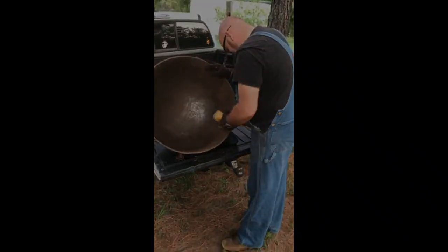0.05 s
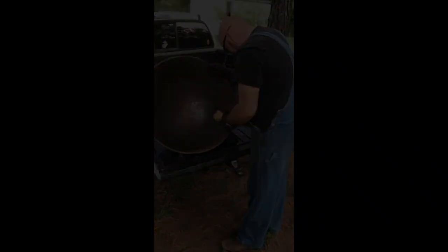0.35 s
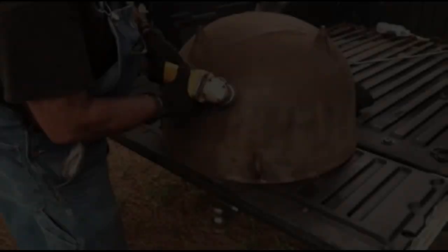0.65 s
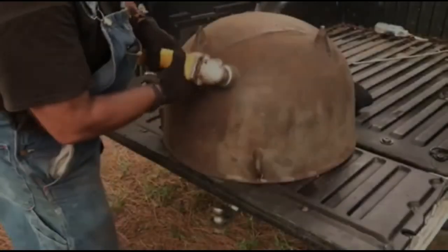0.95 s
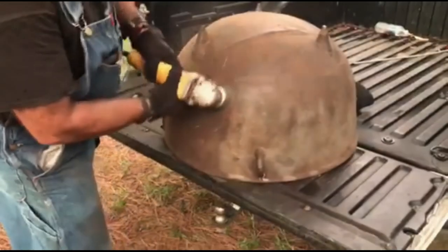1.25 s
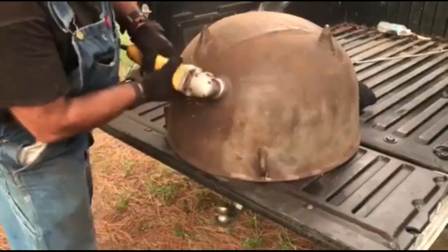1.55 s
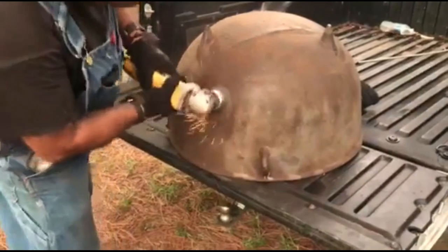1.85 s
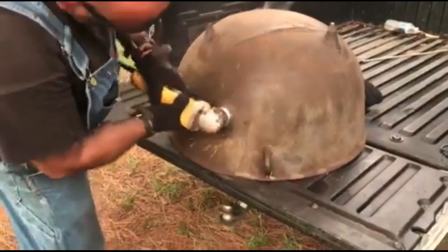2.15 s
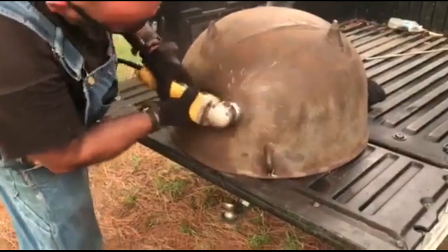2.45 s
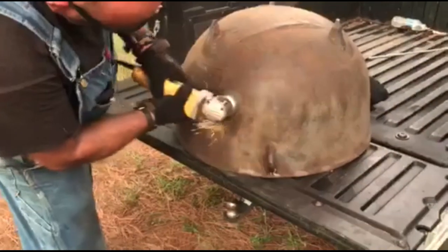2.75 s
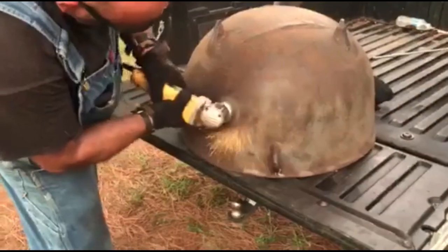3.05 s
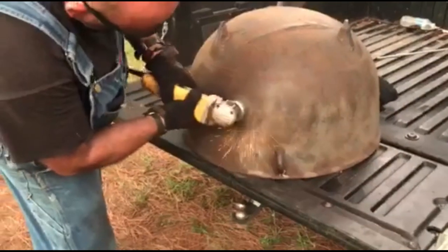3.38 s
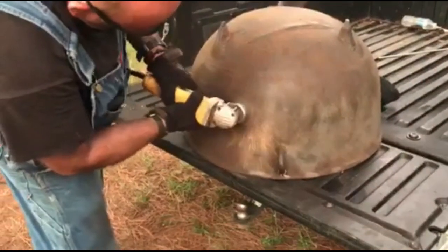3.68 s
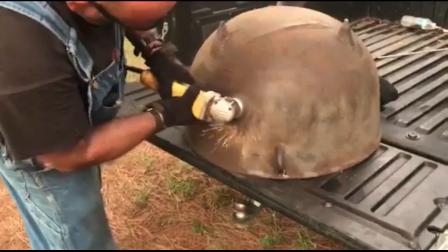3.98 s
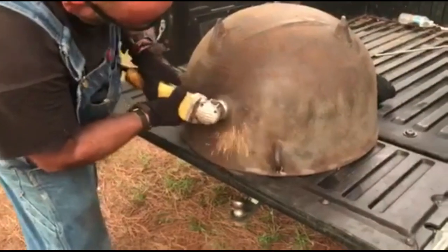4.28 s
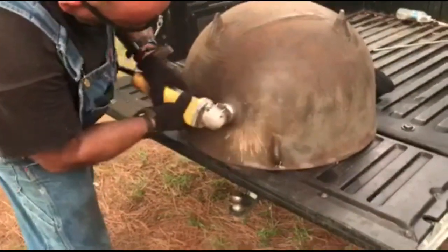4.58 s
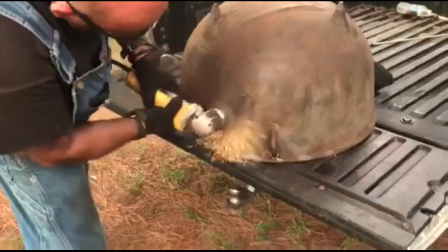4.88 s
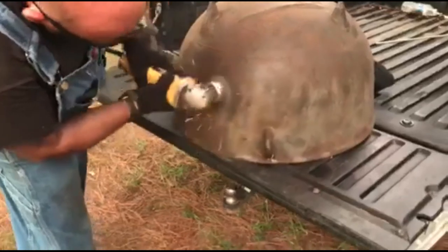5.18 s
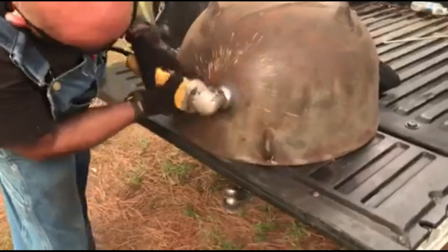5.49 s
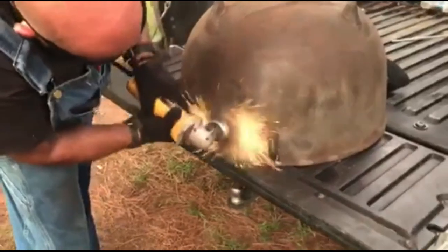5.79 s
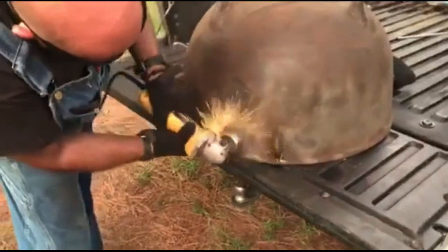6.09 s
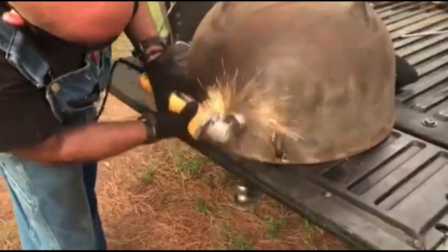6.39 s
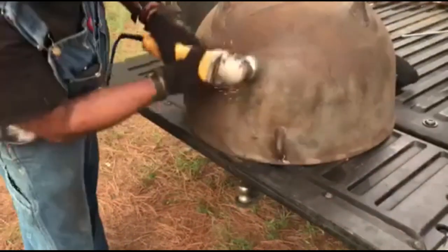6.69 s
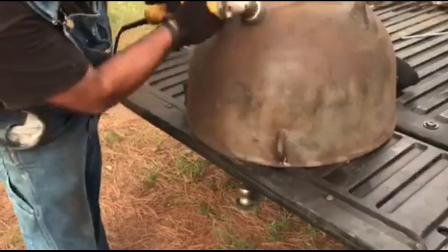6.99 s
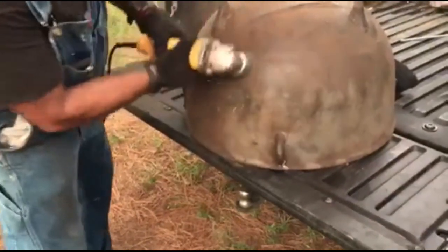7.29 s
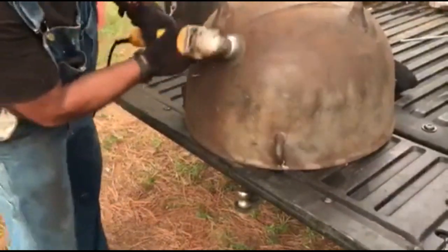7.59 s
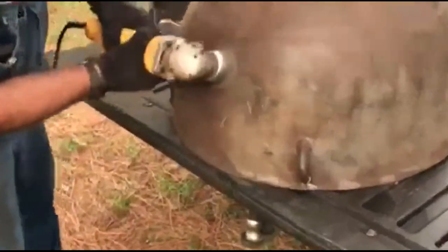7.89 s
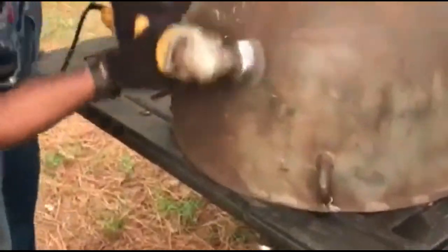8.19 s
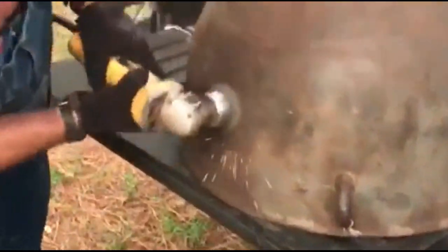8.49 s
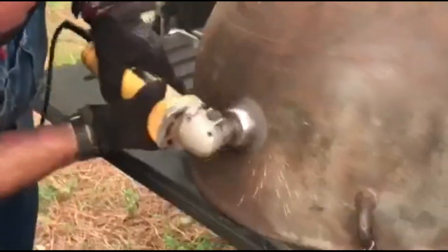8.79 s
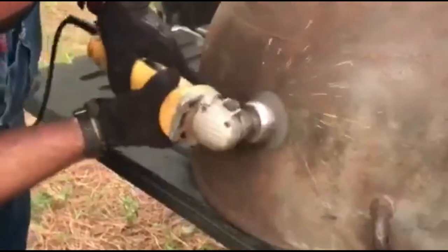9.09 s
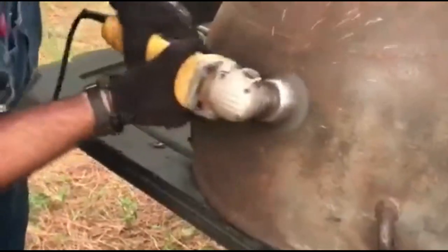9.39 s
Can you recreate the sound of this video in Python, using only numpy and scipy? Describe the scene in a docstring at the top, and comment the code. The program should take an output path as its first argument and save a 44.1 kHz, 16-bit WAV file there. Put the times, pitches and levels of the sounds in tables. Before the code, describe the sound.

Heard close up outdoors with no echo, a spinning wire brush grinds steadily against a big iron pot. The bright, scratchy hiss starts abruptly and keeps fluttering, with tiny catches on rough metal. The angle grinder's whine and thin fan whistle sit beneath it, sag under pressure past halfway and climb back. In the second half the iron's ringing colour changes several times, while a very faint hum stays in the background.

```python
"""A harsh, flickering hiss comes first: an angle grinder's wire cup brush scouring rust off a big
cast iron pot, outdoors, heard close on one microphone with no echo. Thousands of wire tips a second
scratch the iron, and each place on the pot rings in its own way. Under the hiss, motor and fan whine
and the spindle drones; their pitch sags when the brush is pushed hard against the rim.
A faint low hum lies behind it all."""
import sys
import numpy as np
from scipy import signal
from scipy.fft import rfft, irfft
from scipy.io import wavfile
from scipy.ndimage import uniform_filter1d

SR = 44100
rng = np.random.default_rng(int(sys.argv[2]) if len(sys.argv) > 2 else 0)


def unload_audio(sound):
    """Save the sound as a 16-bit wav file, at the path given as the first command line argument."""
    columns = np.transpose(np.atleast_2d(sound))
    # keep every value between -1 and 1, then stretch to whole-number steps
    steps = np.round(np.clip(columns, -1, 1) * 32767)
    wavfile.write(sys.argv[1], SR, steps.astype(np.int16))


N = 425565
T, HZ = np.arange(N) / SR, np.fft.rfftfreq(N, 1 / SR)

# how hard the wires bite, heard as the hiss: (time [s], level [dB])
HISS_LEVELS = [(0.85, -34.5), (1.2, -34.5), (1.36, -32.5), (1.6, -33), (2.3, -34), (2.56, -32.5),
               (2.84, -34), (3.12, -33), (3.3, -33.5), (3.95, -34.3), (4.2, -34), (4.46, -35.2),
               (4.67, -33.7), (4.9, -35), (5.15, -33.5), (5.32, -32.5), (5.52, -33), (5.63, -32.5),
               (5.88, -35), (6.05, -35), (6.5, -35.5), (6.92, -33), (7.22, -34.2), (7.36, -32.5),
               (7.7, -35), (7.8, -32), (8.1, -32), (8.39, -32), (8.46, -33.5), (8.59, -35.5), (8.68, -32),
               (9.18, -32.5), (9.6, -32)]
# the brush's dull rub and the pot's ring: (time [s], rub level [dB], ring level [dB])
RUB_AND_RING_LEVELS = [(1.3, -51.5, -40.5), (2.6, -51.5, -41.5), (5.7, -51.5, -42), (6.6, -54, -41),
                       (7.1, -53.5, -40), (9.65, -53, -40)]
# wires catching on rough iron: (time [s], length [s], boost [dB])
WIRE_CATCHES = [(1.33, 0.012, 2), (1.754, 0.022, 1.5), (2.108, 0.033, 2), (2.205, 0.018, 1.5),
                (2.403, 0.022, 2), (2.545, 0.1, 0.5), (2.952, 0.02, 1.5), (3.095, 0.05, 0),
                (3.348, 0.015, 2.5), (3.623, 0.013, 1.5), (3.805, 0.021, 1), (3.89, 0.021, 1.5),
                (4.16, 0.025, 2.5), (4.392, 0.022, 3), (4.66, 0.02, 0), (4.895, 0.031, 1),
                (5.308, 0.028, 2), (5.397, 0.018, 1.5), (5.579, 0.018, 0), (5.641, 0.021, 0.5),
                (5.81, 0.03, 2), (6.737, 0.024, 2.3), (6.973, 0.012, 1), (7.419, 0.022, 1),
                (7.496, 0.018, -1.5), (7.62, 0.016, 2.5), (7.663, 0.024, 2.5), (7.718, 0.018, 6.5),
                (7.883, 0.006, 2), (8.101, 0.02, 2.5), (8.177, 0.014, 1.5), (8.319, 0.017, 2.5),
                (8.641, 0.013, 2.5), (8.77, 0.011, 3), (8.827, 0.025, 0)]
# spectrum of wire on iron: (frequency [Hz], relative level [dB])
SCRATCH_SPECTRUM = [(20, -41.5), (45, -21.5), (100, -22.5), (170, -24), (330, -23.5), (480, -16),
                    (800, -12.5), (1050, -7), (1450, -7.5), (1800, -10), (2300, -7), (3200, -1), (4600, 1),
                    (4900, -1.5), (6300, 0.5), (8200, 5), (9000, -1)]
# resonances with the brush at each place on the pot: (frequency [Hz], width [Hz], boost [dB])
SIDE_WALL_MODES = [(260, 36, 6.5), (420, 35, 3.5), (680, 580, 2), (880, 420, 1.5), (1086, 100, 4),
                   (1295, 100, 4.5), (1510, 90, 3), (2330, 600, 4.5), (3420, 640, 0.5), (5140, 810, 0.5),
                   (7400, 1500, 2.5)]
LOWER_WALL_MODES = [(626, 250, 1), (1100, 84, 6.5), (1540, 110, 5), (2200, 130, 1), (2600, 150, 2),
                    (3320, 290, 2), (3620, 160, 1.5), (4150, 250, -0.5), (4600, 350, 1.5), (6950, 900, 0.5)]
RIM_MODES = [(275, 60, 5), (580, 20, 9.5), (700, 500, 1), (940, 180, 6), (1080, 89, 3), (1640, 320, 5),
             (1890, 60, 3.5), (2330, 140, 4), (3270, 240, 5.5), (3680, 350, 1), (4020, 200, 2.5),
             (4500, 260, 1), (5580, 1100, 5.5), (7040, 160, 4), (8400, 2700, 7.5)]
SHOULDER_MODES = [(258, 49, 8.4), (416, 25, 2), (607, 41, 2.6), (820, 170, 4.6), (1300, 460, 8.5),
                  (1570, 150, 5.5), (1970, 200, 4.5), (2190, 460, 6), (3820, 1100, 4.4), (5670, 1100, 2.8),
                  (7600, 590, 3.5)]
UPPER_WALL_MODES = [(266, 48, 4), (1170, 710, 4), (1640, 280, 6), (1940, 120, 5), (2220, 190, 6),
                    (3200, 250, 4.5), (3580, 230, 4), (4210, 190, 4.5), (4530, 400, 1), (5270, 1400, 3)]
BELLY_MODES = [(255, 240, 4.2), (570, 97, 3.7), (816, 32, 5.5), (1060, 96, 6.2), (1266, 220, 7),
               (1610, 280, 3.3), (1990, 130, 5.6), (2304, 270, 8.3), (3700, 400, 1.4), (4630, 550, 2.9),
               (5400, 660, 4)]
# the brush moves on to the next place, in the order above: (midpoint time [s], length [s])
BRUSH_MOVES = [(5.2, 0.36), (5.78, 0.19), (6.78, 0.58), (7.36, 0.19), (8.38, 0.28)]
# fuzzy tones in the hiss: (time [s], length [s], frequency [Hz], width [Hz], level [dB])
FUZZY_TONES = [(0.98, 0.54, 4040, 56, -43), (1.0, 0.6, 1210, 54, -51), (4.88, 0.33, 2125, 5.8, -47),
               (5.31, 0.1, 4150, 140, -43), (5.46, 0.42, 3300, 76, -49), (5.554, 0.36, 3590, 34, -45),
               (6.303, 0.24, 1950, 12, -45), (6.35, 0.63, 4170, 48, -48), (6.55, 0.61, 3300, 79, -45),
               (7.48, 0.32, 1940, 9.8, -46), (7.58, 0.55, 4100, 120, -38), (7.57, 0.43, 4540, 80, -36.5),
               (7.987, 0.1, 1945, 12, -41.5)]
# brief dips in the low end: (time [s], length [s], corner frequency [Hz], gain [dB])
BASS_DIPS = [(1.134, 0.029, 430, -22), (1.428, 0.016, 850, -8), (1.753, 0.018, 850, -19),
             (2.116, 0.032, 430, -26), (3.01, 0.026, 900, -12), (3.078, 0.025, 900, -12),
             (3.137, 0.03, 636, -32), (3.476, 0.045, 420, -36), (3.612, 0.018, 800, -23),
             (3.89, 0.023, 900, -20), (4.384, 0.02, 430, -12), (4.707, 0.026, 430, -11),
             (5.333, 0.035, 850, -10), (5.392, 0.036, 430, -21), (5.685, 0.025, 450, -22),
             (6.956, 0.024, 950, -19), (7.09, 0.024, 900, -15), (7.728, 0.034, 850, -10),
             (7.952, 0.014, 800, -23), (8.022, 0.025, 850, -15), (9.33, 0.021, 850, -14),
             (9.492, 0.022, 850, -19)]

# motor speed, sagging under load: (time [s], speed [turns/s])
MOTOR_SPEED = [(0.64, 533), (1.5, 535), (1.85, 548), (2.7, 524), (3.3, 533), (4.4, 516), (4.8, 522),
               (5.65, 516), (5.86, 487), (6.05, 467), (6.4, 459), (6.7, 471), (6.95, 496), (8.35, 520),
               (8.55, 507), (9.25, 521), (9.65, 524)]
# tones of the motor shaft and of its cooling fan: (multiple of motor speed, base level [dB])
MOTOR_TONES = [(1, -59.5), (2, -64)]
FAN_TONES = [(9, -52)]
# tones of the unbalanced brush on the spindle: (multiple of spindle speed, base level [dB])
SPINDLE_TONES = [(1, -69), (2, -77), (3, -79)]
# swells of whine and drone: (time [s], motor gain [dB], spindle gain [dB])
MACHINE_GAINS = [(0.64, 2.5, 7), (0.95, -2, 1), (1.2, -4, 2), (1.75, 0.5, 4.5), (2.15, 3.5, 4.5),
                 (2.5, -3, 1.5), (3.0, -1.5, 0.5), (3.22, 4.5, 2.5), (3.48, 6.5, 2), (3.6, -1, 2),
                 (3.75, 3, 0), (3.95, 0.5, 2), (4.25, 4, -2), (4.45, -9, 2), (4.72, 6, -2), (4.88, -4, -1),
                 (5.6, -0.5, 2), (5.85, -1.5, 2), (6.1, 5.5, -2), (6.4, 4, -1), (6.7, 3, -2), (6.8, 0, -20),
                 (6.92, 0.5, -8), (7.02, -13, -8), (7.6, -12, 3), (8.6, -6, 5), (9.65, -8, 0)]
# fan whistle, clearest with the brush jammed against the rim: (time [s], gain [dB])
FAN_GAINS = [(0.64, 3.5), (5.6, 2), (5.95, -6), (6.2, 6), (6.6, 7), (6.75, 1), (7.3, 0), (9.65, 0)]

# dips in the microphone's response: (frequency [Hz], width [Hz], gain [dB])
MICROPHONE_DIPS = [(4770, 140, -3.5), (6150, 140, -3.5), (7654, 575, -13)]


def scouring(hand_db=-0.02, fizz_db=-37):
    """The brush on the pot: bite, catches and load set the levels of rub, ring, hiss and fizz."""
    bite, load, caught = curves(HISS_LEVELS)[0], sag_percent(), catches()
    unsteady = hand_db * wander(rate=6) + chatter()  # the hand's pressure is never quite even
    rub, ring = curves(RUB_AND_RING_LEVELS)
    fizz = fizz_db + 0.35 * (bite - bite.mean()) - 0.1144 * load  # load flattens the wires
    bands = [(800, rub + 0.2252 * load),  # (upper edge [Hz], level [dB])
             (2200, ring + 0.15 * caught),
             (5200, bite + unsteady + caught),
             (11000, fizz + unsteady + 0.44 * caught)]
    spectrum = rfft(pot(wire_tips(caught)))
    sound, lower = np.zeros(N), 0
    for edge_hz, level_db in bands:
        lowpass = 1 / (1 + (HZ / edge_hz) ** 8)
        band = irfft(spectrum * (lowpass - lower), N)
        power = uniform_filter1d(uniform_filter1d(band ** 2, SR // 5), SR // 5)
        sound += amp(level_db) * band / np.sqrt(power + 1e-12)
        lower = lowpass
    return sound


def wire_tips(caught_db, strikes_per_s=16000, spread_db=2.0, bounce_db=0.12):
    """Tiny strikes of uneven size, swelling as the brush bounces and coarser where it catches."""
    strikes = (rng.random(N) < strikes_per_s / SR) * rng.choice([-1., 1.], N)
    size_db = (spread_db + 0.077 * caught_db) * np.minimum(rng.exponential(1, N), 4)
    return strikes * amp(size_db + bounce_db * wander(rate=15))


def catches():
    """The change in bite, in dB, while the wires catch on rough iron."""
    return sum(db * np.exp(-(2 * (T - time) / length) ** 2) for time, length, db in WIRE_CATCHES)


def chatter(depth_db=0.3, skips_per_s=(18, 32)):
    """The flutter, in dB, of the springy brush skipping on the iron."""
    band = signal.butter(2, skips_per_s, "bandpass", fs=SR, output="sos")
    return depth_db * unit(signal.sosfilt(band, rng.standard_normal(N)))


def pot(strikes):
    """The strikes ring the pot; its colour passes from place to place with the brush."""
    hz, db = np.transpose(SCRATCH_SPECTRUM)
    colour = amp(np.interp(np.log(HZ + 1), np.log(hz), db))
    scratch = rfft(shimmer(iron_ring(strikes))) * colour
    path = (SIDE_WALL_MODES, LOWER_WALL_MODES, RIM_MODES, SHOULDER_MODES, UPPER_WALL_MODES, BELLY_MODES)
    sound, *later_places = [unit(irfft(scratch * response(modes), N)) for modes in path]
    for (time, length), place in zip(BRUSH_MOVES, later_places):
        arrived = np.clip((T - time) / length + 0.5, 0, 1)
        sound = (1 - arrived) * sound + arrived * place
    return sound


def iron_ring(strikes, t60_s=0.095, share=0.34, spots=44):
    """The thick wall rings briefly in a crowd of close modes; each spot brushed wakes another mix."""
    decay = np.exp(-np.log(1000) * T[:SR // 5] / t60_s)
    sound, stay = strikes.copy(), N // spots
    for start in range(0, N - stay, stay):
        passing = strikes[start:start + 2 * stay]
        window = np.sqrt(np.hanning(len(passing)))
        tail = rng.standard_normal(len(decay)) * decay
        ring = signal.fftconvolve(passing * window, tail / np.linalg.norm(tail))[:N - start]
        sound[start:start + len(ring)] += share * ring
    return sound


def shimmer(sound, mid_db=1.58, treble_db=3.5, broad_db=0.79):
    """The hiss flickers: narrow bands swell and fade, most of all in the treble."""
    hz, t, frames = signal.stft(sound, SR, nperseg=1024, noverlap=768)

    def patches(length_s, width_hz):
        blur = np.exp(-0.5 * ((t[:41, None] - t[20]) / length_s) ** 2
                      - 0.5 * ((hz[:41] - hz[20]) / width_hz) ** 2)
        return unit(signal.fftconvolve(rng.standard_normal((len(t), len(hz))), blur, "same")).T

    depth_db = np.interp(hz, [3000, 6500], [mid_db, treble_db])[:, None]
    narrow = np.minimum(patches(length_s=0.019, width_hz=40), 1.5)
    broad = patches(length_s=0.01, width_hz=270)
    gain = amp(depth_db * narrow + broad_db * broad)
    gain /= np.sqrt(np.mean(gain ** 2, axis=1, keepdims=True))  # each band keeps its mean power
    return signal.istft(frames * gain, SR, nperseg=1024, noverlap=768)[1][:N]


def fuzzy_tones():
    """Fuzzy tones swell out of the hiss; the one near 4170 Hz is the fan's whistle under load."""
    sound = np.zeros(N)
    for time, length, hz, width, db in FUZZY_TONES:
        fuzz = wander(width) + 1j * wander(width)
        tone = (fuzz * np.exp(2j * np.pi * hz * T)).real
        sound += amp(db) * plateau(T - time, length) * tone
    return sound


def grinder(waver=0.0012, gear_ratio=0.279):
    """Motor, fan and geared-down spindle turn together; the wires' grip makes the speed waver."""
    speed = curves(MOTOR_SPEED)[0] * (1 + waver * wander(rate=13))
    turns = np.cumsum(speed) / SR
    motor_db, spindle_db = curves(MACHINE_GAINS)
    return motor(turns, motor_db) + fan(turns) + spindle(gear_ratio * turns, spindle_db)


def motor(turns, gain_db, mains_hz=60):
    """The whine throbs at twice the mains frequency; its overtone growls louder under load."""
    throb = 1 + 0.27 * np.cos(2 * np.pi * 2 * mains_hz * T)
    growl = shaft_tones(turns, MOTOR_TONES[1:], flutter=0.67, flutter_hz=16)
    whine = shaft_tones(turns, MOTOR_TONES[:1], flutter=0.33, flutter_hz=12)
    return amp(gain_db) * throb * (whine + amp(0.3 * sag_percent()) * growl)


def fan(turns):
    """The cooling fan gives a rough whistle at a multiple of the motor speed."""
    return amp(curves(FAN_GAINS)[0]) * shaft_tones(turns, FAN_TONES, flutter=0.8, flutter_hz=24)


def spindle(turns, gain_db):
    """The unbalanced brush drones on its spindle, louder under load."""
    drone = shaft_tones(turns, SPINDLE_TONES, flutter=0.3, flutter_hz=7.7)
    return amp(gain_db + 0.83 * sag_percent()) * drone


def shaft_tones(turns, tones, flutter, flutter_hz):
    """Multiples of a shaft's rotation, each fluttering on its own."""
    sound = np.zeros(N)
    for multiple, db in tones:
        tone = np.sqrt(2) * np.cos(2 * np.pi * (multiple * turns + rng.random()))
        sound += amp(db) * tone * (1 + flutter * wander(flutter_hz))
    return sound


def sag_percent(light_work_turns_per_s=530):
    """The load on the motor, as the percentage of speed lost."""
    return 100 * (1 - curves(MOTOR_SPEED)[0] / light_work_turns_per_s)


def hum(hz=58.6, level_db=-66, waver=0.22):
    """A faint, wavering low hum in the background."""
    tone = np.cos(2 * np.pi * hz * T + waver * wander(rate=8))
    return amp(level_db) * unit(tone * (1 + waver * wander(rate=8)))


def thin_bass(sound):
    """The low end drops away for a few hundredths of a second at a time."""
    hz, t, frames = signal.stft(sound, SR, nperseg=512, noverlap=384)
    dip_db = sum(db * np.outer(1 / (1 + (hz / corner) ** 12), plateau(t - time, length))
                 for time, length, corner, db in BASS_DIPS)
    return signal.istft(frames * amp(dip_db), SR, nperseg=512, noverlap=384)[1][:N]


def amp(db):
    """Decibels to gain."""
    return 10 ** (np.asarray(db) / 20)


def unit(x):
    """Scales to an rms of one."""
    return x / np.sqrt(np.mean(x ** 2) + 1e-20)


def curves(rows):
    """Each column of a timed table, sample by sample."""
    times, *columns = np.transpose(rows)
    return [np.interp(T, times, column) for column in columns]


def response(rows):
    """The gain at each frequency of a set of resonances or dips."""
    return amp(sum(db / (1 + (2 * (HZ - hz) / width) ** 2) for hz, width, db in rows))


def plateau(t, length):
    """A flat-topped swell centred on t = 0."""
    return np.exp(-(2 * t / length) ** 4)


def wander(rate):
    """Smooth random drift of rms one, changing up to about rate times a second."""
    return unit(signal.sosfilt(signal.butter(2, rate, fs=SR, output="sos"), rng.standard_normal(N)))


def scene():
    """Brush, pot, grinder and hum at the microphone, the same in both channels."""
    sound = thin_bass(scouring() + fuzzy_tones() + grinder() + hum())
    return np.array([sound, sound])


def record(dry, start_s=0.637, swell_s=0.53, start_db=-4, top_hz=9220):
    """The microphone colours and band-limits the sound, which cuts in mid-work and swells to full."""
    coloured = irfft(rfft(dry) * response(MICROPHONE_DIPS), N)
    swell = amp(start_db * np.clip(1 - (T - start_s) / swell_s, 0, 1)) * (T >= start_s)
    lowpass = signal.firwin(401, top_hz, window=("kaiser", 9), fs=SR)
    return signal.oaconvolve(coloured * swell, lowpass[None], "same")


dry = scene()
out = record(dry)
unload_audio(out)
```